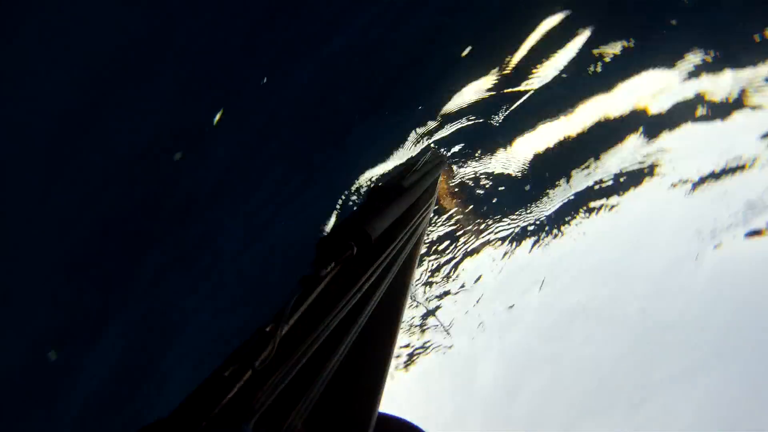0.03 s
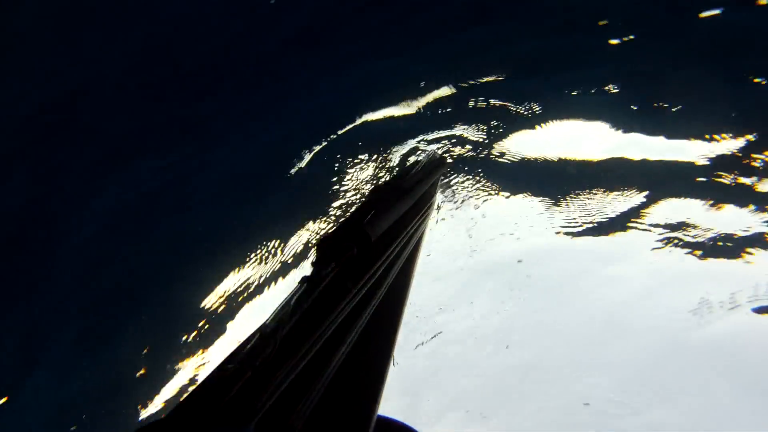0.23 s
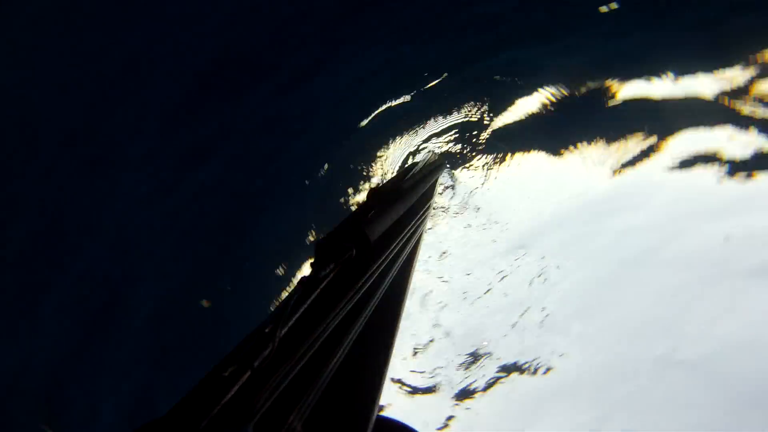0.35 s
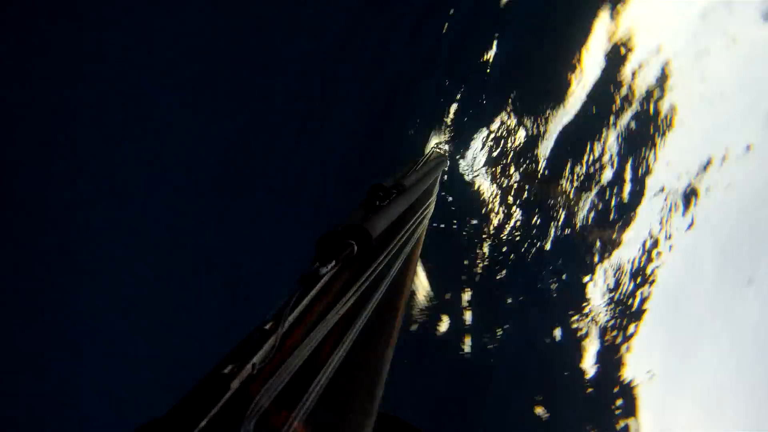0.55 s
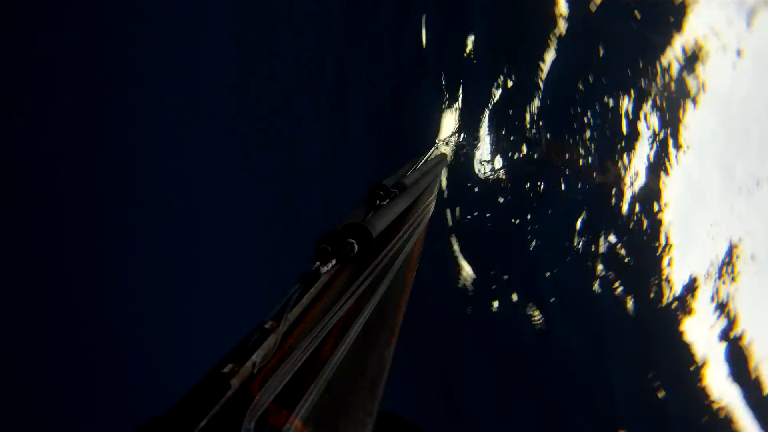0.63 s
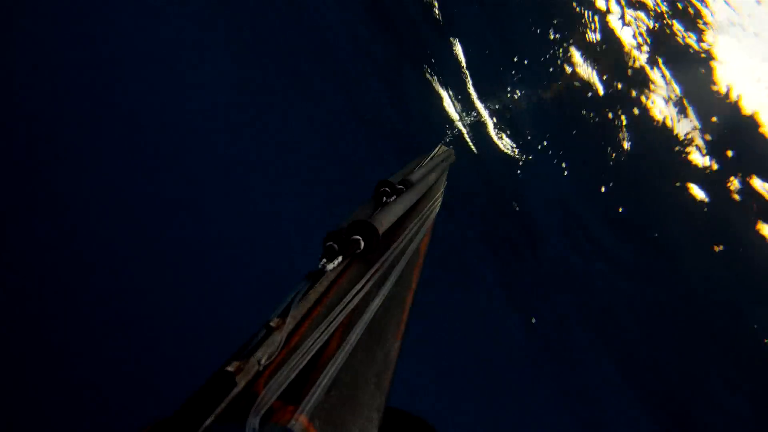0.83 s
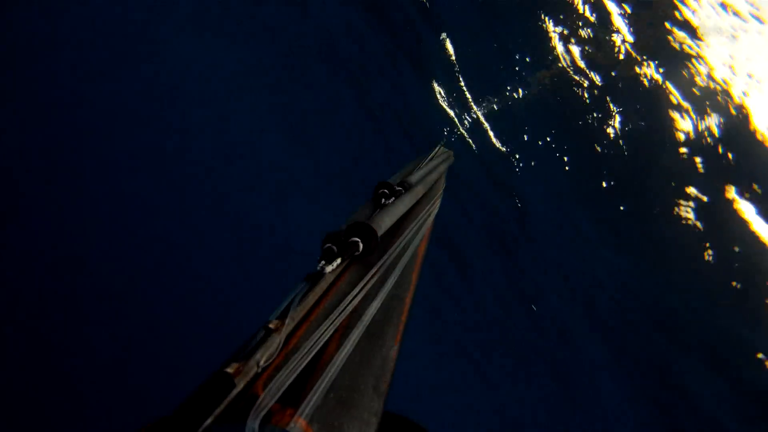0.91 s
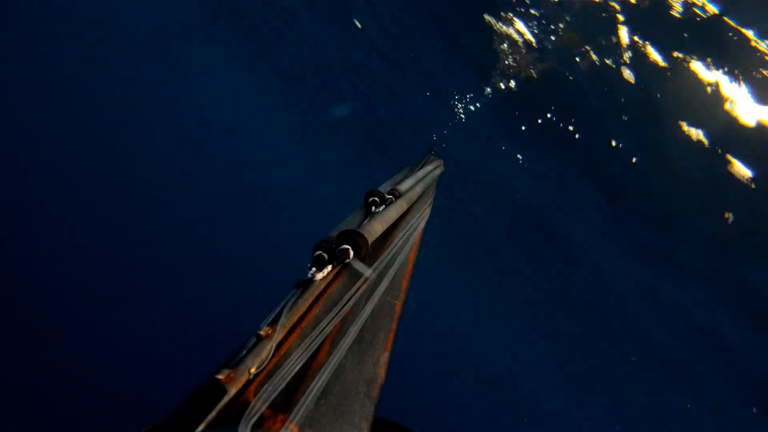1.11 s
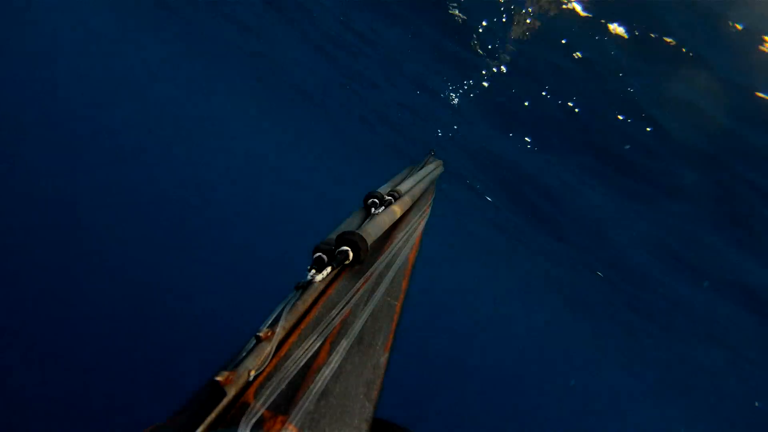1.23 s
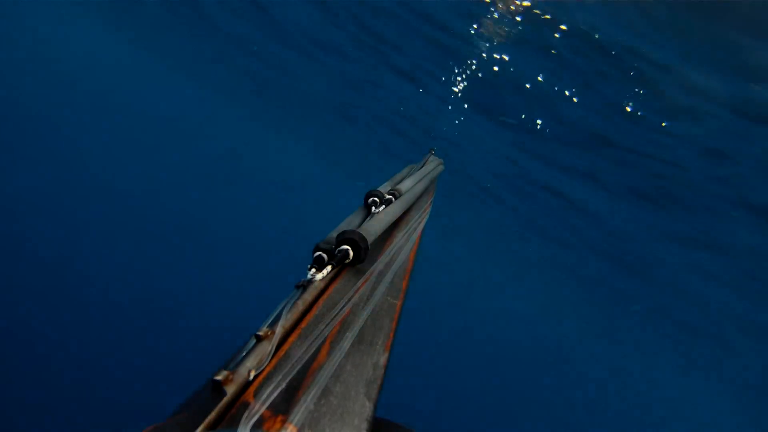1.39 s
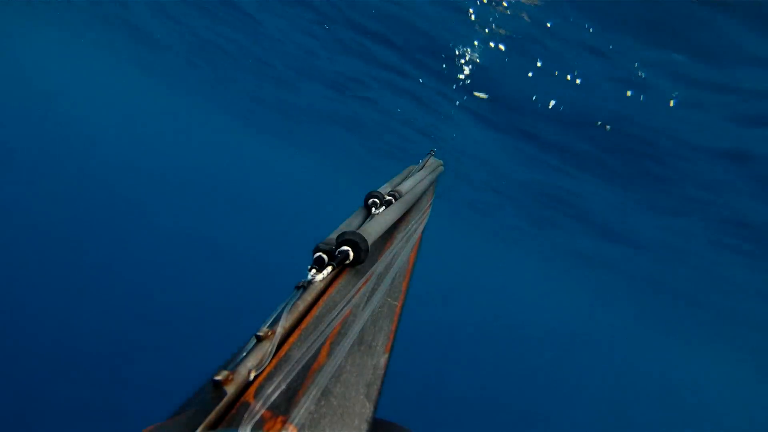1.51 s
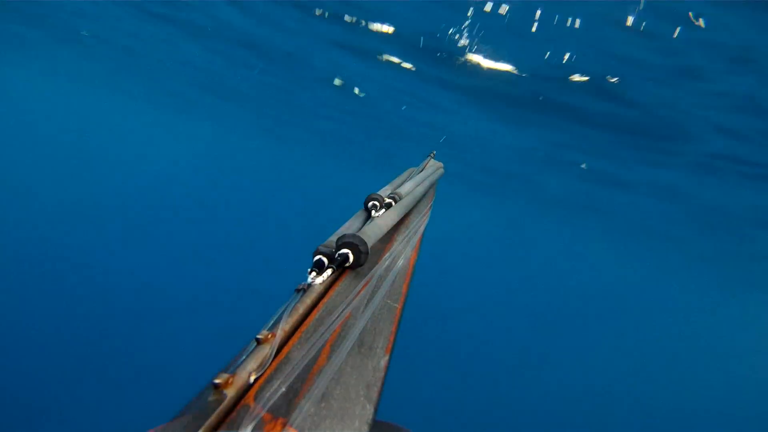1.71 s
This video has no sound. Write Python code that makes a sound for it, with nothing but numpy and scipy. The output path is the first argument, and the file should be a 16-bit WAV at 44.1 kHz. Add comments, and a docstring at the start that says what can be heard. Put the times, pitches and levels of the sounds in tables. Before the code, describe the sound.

Water sloshes and bubbles against a camera housing as it dips under the sea.

```python
"""Water rumbles and sloshes, then waves knock on a camera's waterproof housing and make it ring.
As it dips into the sea, water and gear tick on the shell and bubbles pop and crackle against it.
Slow surges rumble past, and the sloshing calms as the camera sinks.
A coarse converter mirrors every sound into the treble."""
import sys
import numpy as np
from scipy import signal
from scipy.fft import rfft, irfft
from scipy.io import wavfile

SR = 44100
rng = np.random.default_rng(int(sys.argv[2]) if len(sys.argv) > 2 else 0)


def dump(signal):
    """Clip the signal to [-1, 1] and save it as 16-bit WAV at the path in sys.argv[1]."""
    limited = np.clip(np.atleast_2d(signal).T, -1, 1)
    pcm = np.round(limited * 32767).astype(np.int16)
    wavfile.write(sys.argv[1], SR, pcm)


N = 77175
TIME = np.arange(N) / SR
FREQS = np.arange(N // 2 + 1) * SR / N
AGE = TIME[:SR // 4]  # time since an event's onset [s]
BUBBLE_LOW_HZ, BUBBLE_HIGH_HZ = 857, 3200


def from_db(db):
    """Decibels to gain."""
    return 10 ** (np.asarray(db) / 20)


def rms_one(x):
    """Scale to unit power."""
    return x / np.sqrt(np.mean(x ** 2) + 1e-20)


def levels(rows):
    """One gain curve per level column of (time [s], level [dB], ...)."""
    times_s, *columns_db = np.transpose(rows)
    return [from_db(np.interp(TIME, times_s, db)) for db in columns_db]


def add(out, start_s, sound):
    """Mix a sound in at start_s."""
    i = max(int(start_s * SR), 0)
    out[i:i + len(sound)] += sound[:max(N - i, 0)]


def butterworth(x, order, edge_hz, kind="low"):
    """Causal Butterworth filter."""
    return signal.sosfilt(signal.butter(order, edge_hz, kind, fs=SR, output="sos"), x)


def noise(colour):
    """Unit-power noise shaped by (frequency [Hz], level [dB])."""
    hz, db = np.transpose(colour)
    gain = from_db(np.interp(np.log(FREQS + 1), np.log(hz), db))
    return rms_one(irfft(rfft(rng.standard_normal(N)) * gain, N))


def lumpy_noise(colour, spread_db, corner_hz=18.7):
    """Unit-power coloured noise with a slow random swing in level."""
    steady = noise(colour)
    swing = rms_one(irfft(rfft(rng.standard_normal(N)) / (1 + (FREQS / corner_hz) ** 2), N))
    return rms_one(steady * from_db(spread_db * swing))


def decay(t60_s):
    """Exponential fall, 60 dB in t60_s."""
    return from_db(-60 * AGE / t60_s)


def attack(tau_s):
    """Exponential rise to one."""
    return 1 - np.exp(-AGE / tau_s)


def ring(hz, t60_s):
    """Damped sine."""
    return np.sin(2 * np.pi * hz * AGE) * decay(t60_s)


def puff(colour, t60_s):
    """Decaying coloured noise."""
    return noise(colour)[:len(AGE)] * decay(t60_s)


def rumble():
    """Turbulent pressure, with surges that swell and fade over a few cycles."""
    # turbulence envelope: (time [s], level [dB])
    envelope = [(0, -52), (.15, -63), (.22, -27.5), (.46, -38.5), (1.3, -36), (1.53, -43.5)]
    # turbulence spectrum: (frequency [Hz], level [dB])
    colour = [(15, -10.5), (45, 4.5), (100, -14), (200, -97)]
    # water surging past: (time [s], frequency [Hz], level [dB], length [s])
    surges = [(0.19, 48, -19, 0.13), (0.863, 41, -19, 0.062), (0.975, 38.2, -14.5, 0.055),
              (1.091, 34.1, -23, 0.069)]
    out = levels(envelope)[0] * noise(colour)
    for start_s, hz, db, length_s in surges:
        t = TIME[TIME < length_s]
        swell = np.sin(np.pi * t / length_s)
        add(out, start_s, from_db(db) * swell * np.sin(2 * np.pi * hz * t))
    return out


def wash():
    """Lumpy sloshing round the housing and a froth of tiny bubbles, a few of which stand out."""
    # wash envelopes: (time [s], slosh [dB], froth [dB])
    envelopes = [(.15, -42.5, -56.5), (.42, -35.5, -48.5), (.52, -33.5, -38.5), (.62, -33, -44),
                 (.87, -39, -51), (.95, -43.5, -55), (1.03, -34, -40), (1.12, -42, -47), (1.33, -45, -58),
                 (1.55, -48, -56), (1.75, -45, -56)]
    # slosh and froth spectra: (frequency [Hz], level [dB])
    slosh_colour = [(60, -10), (135, 0.5), (220, -5), (310, -1.5), (365, 3), (440, -7), (580, -4.5),
                    (800, -11.5), (2000, -39.5)]
    froth_colour = [(700, -25), (1400, 4.5), (2150, 2.5), (4300, -21.5)]
    grains_per_s, t60_cycles, size_spread_db, grains_db = 350, 11.5, 4, -4
    slosh = lumpy_noise(slosh_colour, spread_db=2.5)
    hiss = lumpy_noise(froth_colour, spread_db=4)
    pitches_hz = rng.triangular(1200, 2000, 3400, size=16)
    grains = np.zeros(N)
    for hz in pitches_hz:
        births = rng.random(N) < grains_per_s / len(pitches_hz) / SR
        sizes = from_db(size_spread_db * np.minimum(rng.exponential(1, N), 4))
        grain = ring(hz, t60_cycles / hz) * attack(1 / hz)
        grains += signal.fftconvolve(births * sizes, grain)[:N]
    froth = hiss + from_db(grains_db) * rms_one(grains)
    slosh_gain, froth_gain = levels(envelopes)
    return slosh_gain * slosh + froth_gain * froth


def knocks():
    """A wave's soft blow rings the housing, the shell clacks faintly, and trapped air gulps."""
    # wave blows: (time [s], housing gain [dB], contact cutoff [Hz], air pocket [Hz], pocket level [dB])
    blows = [(0.234, -7.5, 2060, 853, -7), (.2400, -18.5, 1230, 149.6, -13.5),
             (0.2691, -19, 1220, 707, -20.5), (0.2719, -16, 960, 382.3, -9.5),
             (0.4930, -19.5, 1350, 382, -11.5), (0.4972, -23, 680, 124.4, -17),
             (.8620, -24.5, 453, 920, -24.5), (.9830, -10, 870, 302, -18.5), (0.9866, -15, 690, 510, -18.5),
             (1.2311, -22, 1080, 1050, -57), (1.2841, -22.5, 1400, 1047, -18),
             (1.328, -27, 316, 225.5, -24.5), (1.6170, -31.5, 717, 361.4, -21.5)]
    # housing modes: (frequency [Hz], level [dB], t60 [s])
    modes = [(131.4, -5.5, 0.19), (174, -4, 0.078), (312.6, -9.5, 0.067), (370.8, 2, 0.063),
             (510.4, -2, 0.0315), (837, 3, 0.016), (1033, -10, 0.034), (1276, -3.5, 0.02)]
    mode_jitter_db, clack_db, pocket_t60_cycles = 1.5, -21.5, 23.8
    out = np.zeros(N)
    for start_s, housing_db, contact_hz, pocket_hz, pocket_db in blows:
        ringing = sum(from_db(db + rng.uniform(-mode_jitter_db, mode_jitter_db)) * ring(hz, t60_s)
                      for hz, db, t60_s in modes)
        clack = from_db(clack_db) * ring(hz=3340, t60_s=0.025)
        housing = butterworth(ringing, 3, contact_hz) + clack
        pocket = ring(pocket_hz, pocket_t60_cycles / pocket_hz) * attack(0.5 / pocket_hz)
        add(out, start_s, -from_db(housing_db) * housing - from_db(pocket_db) * pocket)
    return out


def ticks():
    """Water and gear tap the housing: dry, bright rasps that die at once."""
    # taps: (time [s], level before the filter [dB])
    taps = [(.234, -23), (0.484, -34), (0.506, -21), (0.8328, -25), (0.904, -20), (1.465, -41),
            (1.521, -43.5), (1.6151, -24), (1.6244, -33)]
    out = np.zeros(N)
    for start_s, db in taps:
        add(out, start_s, from_db(db) * rng.standard_normal(len(AGE)) * decay(t60_s=0.026))
    return butterworth(out, 2, edge_hz=[1940, 4350], kind="band")


def bubbles():
    """Each bubble pinches off with a snap and a short ring; a second resonance comes with spray."""
    # pinch-offs: (time [s], pitch [Hz], level [dB], t60 [s], second resonance [Hz], its level [dB])
    pops = [(0.4, 2240, -9, 0.0096, 1700, -25), (0.4110, 1970, 2.5, 0.0062, 2600, -18),
            (0.4141, 2174, -6.5, 0.012, 1740, -30), (0.4236, 2430, -14, 0.0094, 3506, -16.5),
            (0.4252, 2405, -2, 0.011, 4780, -15), (0.4627, 2140, -0.5, 0.0065, 4450, -26),
            (0.4987, 2450, -12, 0.017, 5100, -26.5), (0.5422, 2720, -11.5, 0.022, 2070, -8),
            (0.5572, 1940, 1, 0.0081, 2470, -15), (0.5810, 1760, -8.5, 0.005, 3580, -21.5),
            (0.639, 1950, 8.5, 0.0042, 2510, -6), (0.6498, 1440, -11.5, 0.011, 3340, -18.5),
            (0.6908, 1900, -10.5, 0.013, 5290, -24), (0.7125, 2360, -4.5, 0.035, 1710, -5.5),
            (0.7433, 2045, -1, 0.011, 2915, -7.5), (0.8072, 1984, -9, 0.018, 3160, -26),
            (0.8329, 3000, -21, 0.019, 4390, -40), (1.2303, 1517, -8, 0.021, 1090, -24)]
    # snap and spray spectra: (frequency [Hz], level [dB])
    snap_colour = [(800, 2.5), (1400, 0), (3300, -9), (4100, -46)]
    spray_colour = [(1200, -3), (3300, 10.5), (4100, -21), (6000, -2.5)]
    snap_db, spray_db, second_t60_s = -22, -10.5, 0.014
    onset = attack(tau_s=0.00029)
    main, second = np.zeros((2, N))
    for start_s, hz, db, t60_s, second_hz, second_db in pops:
        snap = from_db(snap_db) * puff(snap_colour, t60_s=0.028)
        spray = from_db(spray_db) * puff(spray_colour, second_t60_s)
        add(main, start_s, from_db(db) * onset * (ring(hz, t60_s) + snap))
        add(second, start_s, from_db(second_db) * onset * (ring(second_hz, second_t60_s) + spray))
    main = butterworth(main, 4, BUBBLE_HIGH_HZ)
    return butterworth(main + second, 4, BUBBLE_LOW_HZ, "high")


def crackles():
    """Clusters of tiny bubbles burst as runs of uneven clicks, ringing briefly at two pitches."""
    # bubble clusters: (time [s], level at the lower pitch [dB], length [s])
    clusters = [(0.4408, -37, 0.0054), (0.6195, -24.5, 0.0011), (0.634, -28, 0.0018), (0.993, -32, 0.0067),
                (1.0367, -31.5, 0.0061), (1.0627, -18.5, 0.0028), (1.078, -27, 0.0033),
                (1.0847, -23.5, 0.0052), (1.0919, -21, .003), (1.152, -32.5, 0.0041), (1.199, -43.5, .02),
                (1.369, -49.5, .02)]
    low_hz, high_hz, clicks_per_s = 2063, 3020, 2000
    out = np.zeros(N)
    for start_s, db, length_s in clusters:
        for hz in low_hz, high_hz:
            clicks = (rng.random(len(AGE)) < clicks_per_s / SR) * rng.standard_normal(len(AGE))
            clicks[0] = 1
            grain = ring(hz, t60_s=0.0054) * attack(1 / hz)
            run = signal.fftconvolve(clicks * (AGE < length_s), grain)
            run /= np.sqrt(np.sum(run ** 2) / (length_s * SR))
            add(out, start_s, from_db(db) * low_hz / hz * run)
    return butterworth(out, 2, BUBBLE_HIGH_HZ)


def scene():
    """All sound comes through the housing, so the channels nearly match; the microphone hisses faintly."""
    water = bubbles() + knocks() + rumble() + wash() + crackles() + ticks()
    mid = water + from_db(-64) * rng.standard_normal(N)
    side = from_db(-44) * wash()
    return np.array([mid + side, mid - side])


def record(dry):
    """A narrow-band converter holds each sample, mirroring the sound about its rate; peaks clip."""
    band_hz, hold_hz, mirror_db, cutoff_hz = 5650, 12000, -0.5, 15800
    baseband = butterworth(dry, 10, band_hz)
    # hold images: differentiate, shift to either side of hold_hz, integrate
    slope = irfft(rfft(baseband) * 1j * FREQS, N)
    steps = 2 * np.cos(2 * np.pi * hold_hz * TIME) * slope
    mirror = irfft(rfft(steps) / (1j * np.maximum(FREQS, hold_hz / 2)), N)
    clipped = np.clip(baseband + from_db(mirror_db) * mirror, -0.9, 0.9)
    top_cut = signal.ellip(10, 0.2, 80, cutoff_hz, fs=SR, output="sos")
    return signal.sosfilt(top_cut, clipped)


dry = scene()
out = record(dry)
dump(out)
```